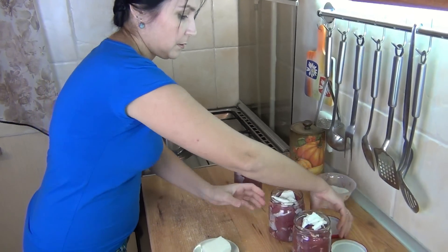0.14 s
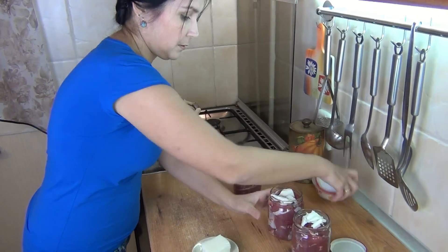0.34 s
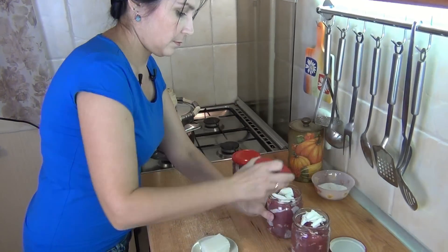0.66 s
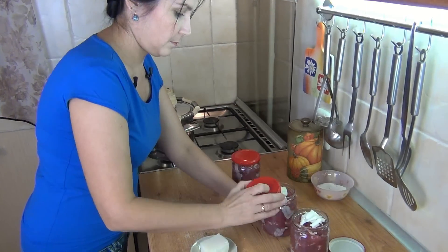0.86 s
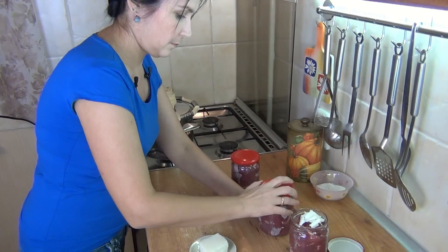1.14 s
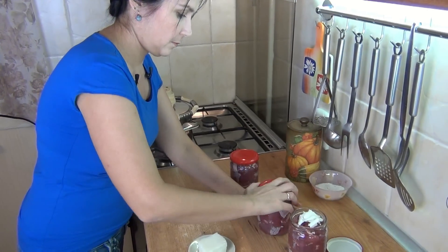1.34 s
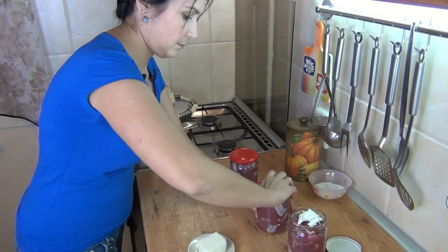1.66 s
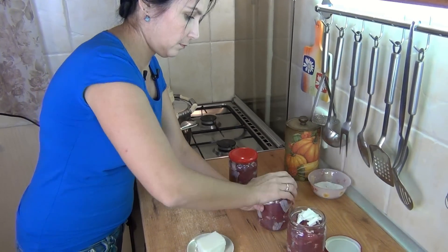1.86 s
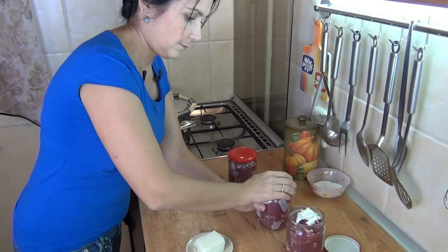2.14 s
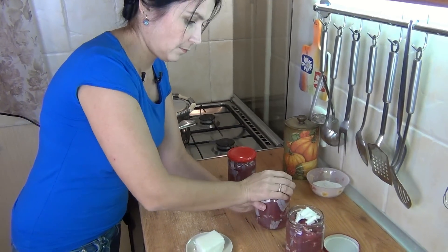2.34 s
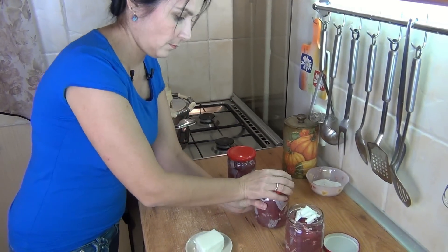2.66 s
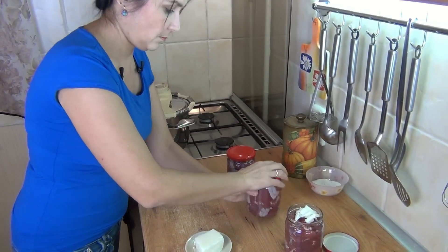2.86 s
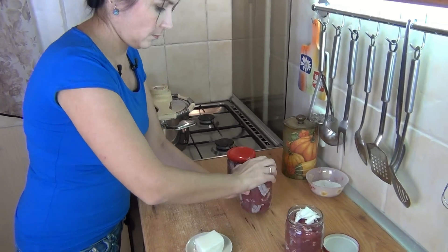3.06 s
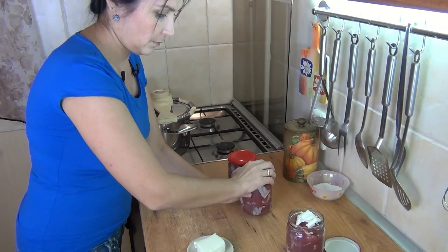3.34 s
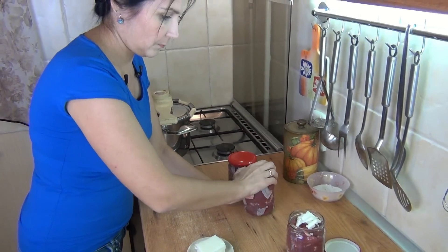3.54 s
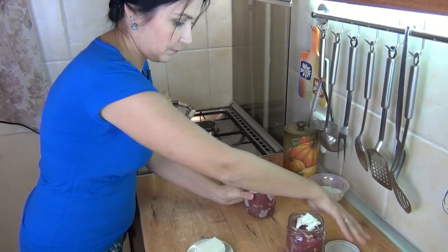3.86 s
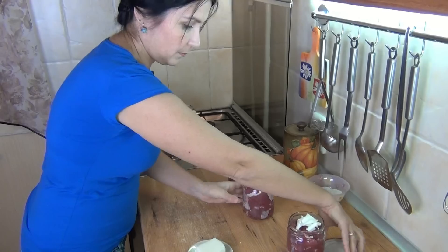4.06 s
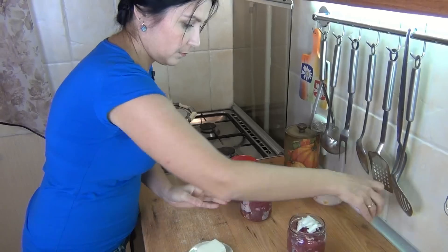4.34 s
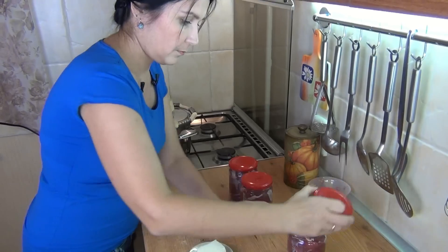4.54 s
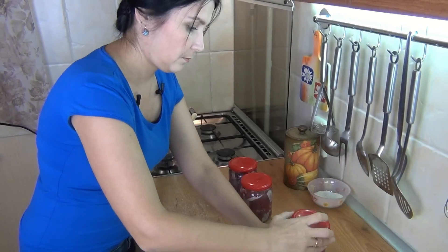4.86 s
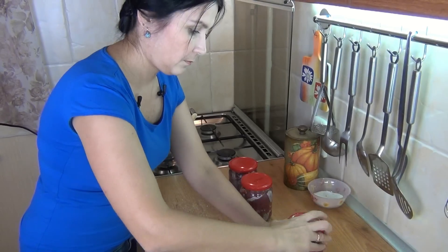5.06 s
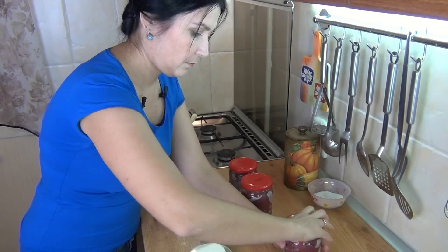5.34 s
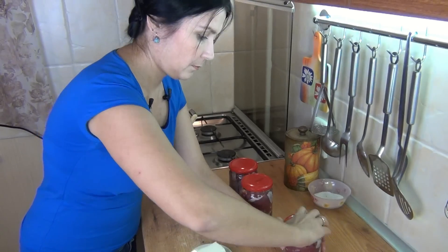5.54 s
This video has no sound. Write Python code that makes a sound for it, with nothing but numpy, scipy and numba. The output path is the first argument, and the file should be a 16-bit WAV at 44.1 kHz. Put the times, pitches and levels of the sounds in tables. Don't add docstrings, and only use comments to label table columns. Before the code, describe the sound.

In a small tiled kitchen, a tin lid is picked up, a heavy full jar drags stuttering over wood, then the lid clinks onto glass and twists with short gritty rasps. The jar is set down with one loud hard knock; a second lid clatters on and turns. Heard from about two metres by a camera, with low hiss.

```python
import sys
import numpy as np
from scipy import signal
from scipy.fft import rfft, irfft
from scipy.io import wavfile
from numba import njit

SR = 44100
rng = np.random.default_rng(int(sys.argv[2]) if len(sys.argv) > 2 else 0)


def ratio(d):
    e = np.asarray(d, float) / 20
    return 10 ** e


def wav_out(sig):
    wavfile.write(sys.argv[1], SR, np.round(np.clip(np.atleast_2d(sig).T, -1, 1) * 32767).astype(np.int16))


N = 251546

# f/Hz, density/dB per Hz
PORT_HISS = [(8.8, -35.5), (15, -4.5), (54, -8.5), (176, -17.5), (400, -25.5), (2250, -38), (15000, -51),
             (16300, -65)]
# f/Hz, level/dB
WHINE = [(7812, -96), (15622, -88)]
# f/Hz, left minus right/dB
PORT_BALANCE = [(60, 1), (110, 15), (200, 9), (700, 4.5), (1290, -1), (2380, -2), (8120, 3.5),
                (15000, -5.5)]
# f/cavity pitch, level/dB, t60/s
CAVITY_MODES = [(0.5, -10.5, 0.17), (0.652, -4.5, 0.11), (0.8, -8.5, .1), (0.932, -9, 0.46),
                (0.998, 3, 0.18), (1.091, -18, 0.63), (1.301, -5, 0.14), (1.552, -16.5, 0.023)]
# f/Hz, level/dB, t60/s
PLATE_MODES = [
    [(2140, -3, 0.14), (2300, -8.5, .12), (2496, 1, 0.16), (2724, -7, 0.15), (3040, 1, 0.11),
     (3186, -6.5, 0.24), (3322, -1, 0.24), (4175, -1, 0.17)],
    [(2050, -7, 0.14), (2315, 0.5, 0.15), (2480, 2, 0.23), (2790, -8, 0.12), (3137, -3, 0.16),
     (3295, -10.5, 0.4), (4200, -23, .12), (4370, -16, 0.42)],
]
# f/Hz, level/dB, t60/s
RIM_MODES = [
    [(5204, 9, 0.27), (5310, 7, 0.19), (5910, 4, 0.17), (6200, 6, 0.28), (6570, 4, 0.18), (7240, -3, 0.3),
     (7460, -1.5, 0.25), (8500, -27, 0.091), (9370, -2.5, 0.23), (10900, -0.5, 0.14), (11320, -2, 0.2356),
     (12900, -4, 0.12), (14300, -1, 0.2215), (15658, -4, .15)],
    [(4630, -12, 0.32), (5390, -4.5, 0.46), (6380, -1.5, 0.35), (6820, 0, 0.24), (7480, -1, 0.27),
     (7470, -10, 0.16), (9240.3, -7, 0.1808), (10500, -39, 0.075), (11470, -11, .2), (11560, -29, .15),
     (13292, -5, 0.2422), (13650, -14.5, 0.17), (14600, -4, 0.1685)],
]
# t/s, cavity level/dB, cavity f/Hz, plate over cavity/dB, finger freedom/0-1
LANDINGS = [(0.166, -46, 908, -11, 0.25), (1.098, -33, 1228, 8.5, 0.58), (1.225, -23, 1210, -3, 0.43),
            (1.348, -19.5, 1242, -5, 0.21), (1.782, -39, 880, -30, 0.4), (3.678, -40.5, 920, -13, 0),
            (4.543, -61, 1210, 1.5, 0.5), (4.75, -62, 1760, 3.5, 1), (4.831, -31, 1234, 4, 0.62),
            (5.016, -28, 1300, -16, 0.4), (5.12, -28.5, 1166, -17.5, 0.23), (5.205, -25, 1133, -16.5, 0.54),
            (5.38, -33, 1210, -18.5, 0.5), (5.486, -36, 960, -7, 0.03)]
# t/s, cavity level/dB, cavity f/Hz, plate over cavity/dB, freedom/0-1
EDGE_TOUCHES = [(0.204, -34, 830, -14, 0.08), (1.516, -33.5, 1120, -17.5, 0.3),
                (1.551, -37, 1047, -23, 0.23), (1.767, -45.5, 1180, -38, 1),
                (4.051, -51.5, 1760, -14.5, 0.15), (4.065, -43.5, 860, -14.5, 0.38),
                (4.927, -41.5, 1170, -10.5, 0.4), (5.158, -14.5, 1306, -19, 0.13),
                (5.166, -28.5, 1220, -42, 0.3), (5.177, -28, 1260, -23, 0.18),
                (5.218, -21, 1252, -14, 0.18), (5.423, -28, 1280, -10.5, 0.17),
                (5.431, -27.5, 1085, -28, 0.2), (5.687, -29, 1023, -20.5, 0.8)]
# t/s, cavity level/dB, cavity f/Hz, plate over cavity/dB, freedom/0-1
SEAL_BUMPS = [(0.513, -54.5, 800, -1, 0), (1.263, -27.5, 1117, -10.5, 0.52), (1.336, -27, 1114, -21, 0.19),
              (1.364, -32.5, 1080, 3, 0.08), (1.747, -56, 1145, -23, 0.8), (1.826, -24, 1246, -9.5, 0.18),
              (4.853, -31.5, 1670, -11, 0.08), (4.886, -54, 1210, 13.5, 0.35),
              (5.003, -36, 1600, -19, 0.08), (5.008, -31, 1530, -5.5, 0.46), (5.045, -28, 1297, -20, 0.09),
              (5.636, -40.5, 1320, -9, 0.12)]
# peak t/s, 20 dB rise/s, 20 dB fall/s, level/dB, resonance f/Hz
BRUSHES = [
    (0.211, .07, 0.081, -55.5, 960),
    (1.822, .02, 0.014, -60, 970),
    (2.662, 0.0081, 0.11, -61.5, 849),
    (4.145, 0.062, 0.076, -54, 630),
    (4.552, .06, 0.13, -71, 714),
    (4.728, .2, .15, -68.5, 684),
    (5.693, 0.061, .1, -50.5, 850),
]
# peak t/s, 20 dB rise/s, 20 dB fall/s, level/dB, resonance f/Hz
SLIDES = [(0.605, 0.09, -0.22, -52.5, 800), (0.815, 0.1756, 0.11, -41.5, 640),
          (0.925, 0.1554, 0.11, -43.5, 660), (1.614, 0.04, -0.02, -38.5, 830),
          (1.79, 0.0257, 0.1, -39.5, 895), (1.827, 0.07, -0.0864, -32.5, 890),
          (1.87, -0.84, -0.08, -53, 720), (2.538, 0.63, 0.4, -62.5, 703), (2.862, 0.02, -0.01, -38, 622),
          (3.675, 0.05, -0.4, -49.5, 592), (4.15, 0.05, 0.03, -34, 640), (4.235, 0.07, 0.06, -42.5, 590),
          (5.688, 0.07, -0.5, -36, 850)]
# peak t/s, 20 dB rise/s, 20 dB fall/s, level/dB, resonance f/Hz
TWISTS = [
    (1.2, 0.0086, 0.017, -44, 1140),
    (1.227, 0.0045, 0.0087, -27.5, 1240),
    (1.262, 0.01844, 0.063, -34.5, 1200),
    (1.358, 0.034, 0.1, -42, 1070),
    (1.52, 0.056, 0.16, -49, 1080),
    (5.223, 0.0067, 0.043, -38.5, 1040),
    (5.3, 0.074, 0.1365, -47.5, 995),
]
# t/s, knock level/dB
STUMBLES = [(0.579, -54), (0.619, -48.5), (0.721, -41), (0.744, -47), (0.794, -35.5), (0.811, -29.5),
            (0.834, -24), (0.87, -38), (0.907, -31.5), (0.937, -33.5), (0.977, -35), (1.012, -43),
            (2.836, -44), (2.849, -36.5), (2.857, -35.5), (4.189, -31), (4.224, -36), (4.248, -38)]
# t/s, knock level/dB, ring length/0-1, hardness/dB per octave
SET_DOWNS = [(1.618, -37.5, .6, -5), (1.831, -26.5, 0.55, -6), (2.538, -51, 1, 3), (2.691, -57.5, 0.53, 7),
             (2.778, -58.5, 0.52, -4), (3.242, -5.5, 0.17, 1), (3.502, -31.5, 0.56, -2),
             (3.662, -25.5, 0.2, -10.5), (3.704, -38.5, 0.4, -17), (3.768, -46.5, 0.55, -8),
             (3.873, -17, 0.41, 0.5), (4.036, -43.5, 0.3, 1), (4.132, -37, 0.7, 4), (4.718, -52.5, 0.5, 2),
             (5.677, -30, 1, 4)]
# f/Hz, level/dB, t60/s
WOOD_MODES = [(338.3, -19, 0.091), (471.4, -14, 0.16224), (560.5, 2.5, 0.042), (644, 3.5, 0.044),
              (826, -4, 0.046), (973, 4, 0.022), (1210, -6, 0.061), (1598, -0.5, 0.013),
              (1886, -17.5, 0.061), (2187, -15.5, 0.025), (2610, -15.5, 0.01), (3242, -37.5, 0.0017)]
# f/Hz, level/dB, t60/s
THUD_MODES = [(77.3, -10.5, 0.45), (113.9, -4, 0.28), (167, -18, 0.1), (220, -8, 0.11)]
# f/Hz, density/dB per Hz
RUB_HISS = [(710, -9.5), (1200, -11), (1910, -7.5), (2560, -12.5), (4310, -19.5), (6950, -20), (10500, -27),
            (16000, -37)]
# f/Hz, t60/s, level/dB
KITCHEN_BANDS = [(93, 0.65, -3), (292, 0.59, -1.5), (491, 0.4, -6.5), (1020, 0.41, -4.5), (1920, 0.38, -6),
                 (3900, 0.36, -6.5), (6980, 0.32, -5.5), (14400, 0.2, -9)]


def colour(x, points, turn_rad=0.):
    hz, db = np.transpose(points)
    f_hz = np.maximum(np.fft.rfftfreq(x.shape[-1], 1 / SR), 1)
    gain = ratio(np.interp(np.log(f_hz), np.log(hz), db))
    return irfft(rfft(x) * gain * np.exp(1j * turn_rad), x.shape[-1])


def unit(x):
    return x / np.sqrt(np.mean(x ** 2))


def floor():
    t = np.arange(N) / SR
    hiss = unit(colour(rng.standard_normal((2, N)), PORT_HISS))
    whine = sum(ratio(db) * np.sin(2 * np.pi * hz * t) for hz, db in WHINE)
    return ratio(-57.5) * hiss + whine


def add(out, at_s, sound, lag):
    start = int((at_s - .001) * SR)
    for port, i in enumerate(start + np.array([0, lag])):
        out[port, i:i + len(sound)] += sound[:N - i]


def ring(modes, freedom, scatter_db, rise_s, split=0.015, choke=1., count=2):
    hz, db, t60 = np.transpose(np.repeat(modes, count, axis=0))[:, :, None]
    t60 = np.clip(t60 * np.clip(freedom, .03, 2), 0, .15)
    t = np.arange(int(t60.max() * SR) + 99) / SR
    level_luck, pitch_luck, phase_luck = rng.standard_normal((3, len(hz), 1))
    phase = np.pi * (np.arange(len(hz))[:, None] // count) + .6 * phase_luck
    level = ratio(db + scatter_db * level_luck)
    fade = np.exp(-np.log(1000) * (t / t60) ** choke)
    tones = np.sin(2 * np.pi * hz * (1 + split * pitch_luck) * t + phase)
    y = (level * fade * tones).sum(axis=0)
    y = y * (1 - np.exp(-t / rise_s)) ** 2
    return y / np.abs(y).max()


def tick(lo_hz, hi_hz, decay_s):
    t = np.arange(SR // 40) / SR
    sos = signal.butter(2, [lo_hz, hi_hz], "bandpass", fs=SR, output="sos")
    fade = np.exp(-t / decay_s) + 1.8 * np.exp(-t / 0.0005042)
    y = signal.sosfilt(sos, rng.standard_normal(len(t)) * fade)
    return y / np.abs(y).max()


def clinks():
    out = np.zeros((2, N))
    for touches, rim_over_db in ((EDGE_TOUCHES, 2), (LANDINGS, -7), (SEAL_BUMPS, -15.5)):
        for s, cavity_db, cavity_hz, sharp_db, freedom in touches:
            lid = int(s > 3.9)
            lag = rng.integers(-1, 2)
            plate_db = cavity_db + sharp_db
            rim_db = plate_db + rim_over_db
            smear = .035 - .038 * min(freedom, .75)
            rise_s = 0.000067 * ratio(.5 * (cavity_db - rim_db))
            cavity_modes = np.array(CAVITY_MODES) * (cavity_hz, 1, 1)
            cavity = ring(cavity_modes, 0.42 * freedom, 5.1, rise_s, choke=2.05)
            plate = ring(PLATE_MODES[lid], 1.04 * freedom, 3.4, 0.00044, smear, count=3)
            rim = ring(RIM_MODES[lid], 0.41 * freedom, 3.057, 0.0011, 0.74 * smear, count=3)
            add(out, s, ratio(cavity_db) * cavity, lag)
            add(out, s, ratio(plate_db + 4.5) * plate, lag)
            add(out, s, ratio(rim_db + 2.5) * rim, lag)
            add(out, s, ratio(plate_db + 3.5 - 4.6 * freedom) * tick(865.4, 4400, 0.0012), lag)
            add(out, s, ratio(rim_db + 11 - 14 * freedom) * tick(3000, 12500, 0.0066), lag)
    return out


@njit
def svf(x, hz, q):
    y, b, l = np.empty(len(x)), 0., 0.
    for i in range(len(x)):
        g = np.tan(np.pi * hz[i] / SR)
        v = (b + g * (x[i] - l)) / (1 + g * (g + 1 / q[i]))
        b, l, y[i] = 2 * v - b, l + 2 * g * v, v / np.sqrt(q[i])
    return y


def slips(per_s, spread_db):
    clicks = rng.random(N) < per_s / SR
    return clicks * rng.standard_normal(N) * ratio(spread_db * rng.exponential(size=N))


def pressure(strokes):
    t = np.arange(N) / SR
    total = 0
    for s, rise_s, fall_s, db, _ in strokes:
        drop = np.maximum((s - t) / abs(rise_s), (t - s) / abs(fall_s))
        total = total + ratio(db - 20 * drop)
    return total


def rubs():
    t = np.arange(N) / SR
    wood = ring(WOOD_MODES, 0.78, 0.62, 0.0003, 0.076, count=1)
    rows = np.array(sorted(SLIDES + TWISTS + BRUSHES))
    grit = slips(1400, 2.8)
    centre_hz = np.interp(t, rows[:, 0], np.clip(rows[:, -1], 200, 3000))
    tin = np.clip((centre_hz - 1000) / 200, 0, 1)
    q = 1.4 + 4 * tin
    broad = unit(signal.fftconvolve(grit, wood)[:N])
    peaked = unit(svf(svf(grit, centre_hz, q), centre_hz, q))
    body = unit(np.clip(1 - 0.86 * tin, 0, 1) * broad + 0.99 * peaked)
    hiss = unit(colour(unit(slips(3500, 1.0)), RUB_HISS))
    board = ring(THUD_MODES, 1.0, 2.4, 0.00084)
    rumble = unit(signal.fftconvolve(slips(120, 2.1), board)[:N])
    out = np.zeros(N)
    for strokes, hiss_db, rumble_db in ((SLIDES, -22.5, -13.5), (TWISTS, -16, -31), (BRUSHES, -2.8, -5)):
        mix = ratio(-3.5) * body + ratio(hiss_db + 2.0) * hiss + ratio(rumble_db - 9) * rumble
        out += pressure(strokes) * mix
    return out


def knocks():
    out = np.zeros((2, N))
    # ring length, hardness/dB per octave, tick and thud offset/dB
    stumbles = [(*row, 0.53, -7, -4.5) for row in STUMBLES]
    set_downs = [(*row, 0) for row in SET_DOWNS]
    for s, knock_db, length, tilt_db, weight_db in set_downs + stumbles:
        pivot_hz = WOOD_MODES[2][0]
        wood = [(hz, db + tilt_db * np.log2(hz / pivot_hz), t60) for hz, db, t60 in WOOD_MODES]
        lag = rng.integers(-1, 2)
        thud_db = -30 + 0.49 * knock_db + weight_db
        tick_db = -29 + 0.96 * knock_db + 1.162 * tilt_db + weight_db
        knock = ring(wood, 1.48 * length, 1.0, 0.00013, 0.04, choke=1.11, count=1)
        add(out, s, ratio(knock_db) * knock, lag)
        add(out, s, ratio(thud_db + 1.5) * ring(THUD_MODES, 0.79, 3.1, 0.0032, count=1), lag)
        add(out, s, ratio(tick_db + 5.5) * tick(800, 5500, 0.0018), lag)
    return out


def kitchen(dry):
    t, tail = np.arange(SR) / SR, 0
    for hz, t60, db in KITCHEN_BANDS:
        noise = rng.standard_normal((3, SR))
        edges = [(hz / 2, -30), (hz / 1.42, 0), (hz * 1.446, 0), (hz * 2, -30)]
        band = colour(noise[:2] + 0.6 * noise[2], edges)
        fade = np.exp(-np.log(1000) * t / t60) * np.sqrt(np.log(1000) / t60 / SR)
        tail = tail + ratio(db) * band * fade
    tail = tail * np.clip((t - .004) / .011, 0, 1)
    return signal.fftconvolve(dry[None], tail, axes=1)[:, :N]


def scene():
    dry = clinks() + knocks() + rubs()
    heard = dry + kitchen(dry[0])
    lead_rad = -1.33
    left = colour(heard[0], [(hz, db / 2) for hz, db in PORT_BALANCE], lead_rad / 2)
    right = colour(heard[1], [(hz, -db / 2) for hz, db in PORT_BALANCE], -lead_rad / 2)
    return np.array([left, right]) + floor()


def low_pass(x):
    return signal.sosfilt(signal.butter(12, 16670, fs=SR, output="sos"), x)


def record(dry):
    mix = np.tanh(dry / 0.27) * 0.25
    return low_pass(mix)


dry = scene()
out = record(dry)
wav_out(out)
```